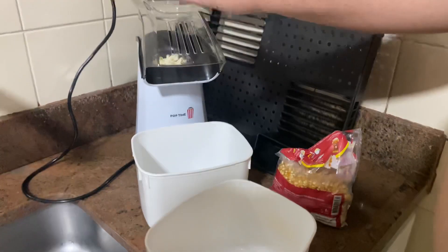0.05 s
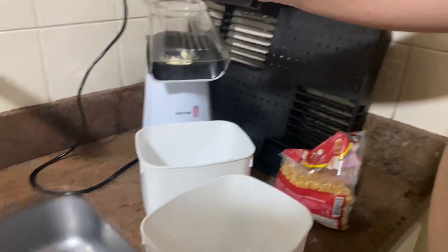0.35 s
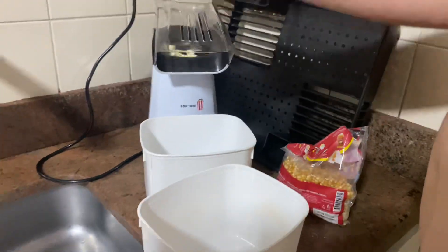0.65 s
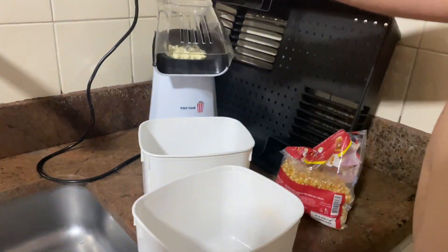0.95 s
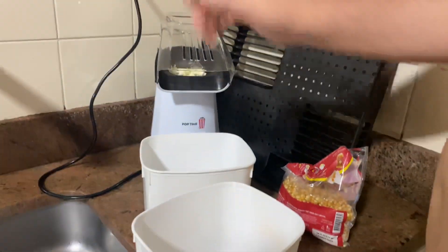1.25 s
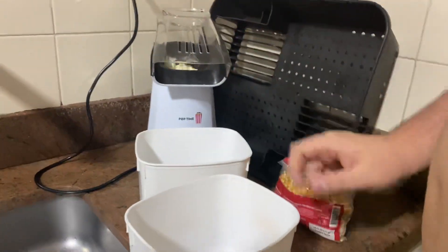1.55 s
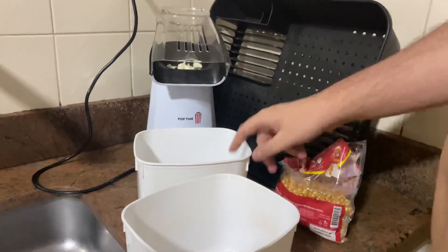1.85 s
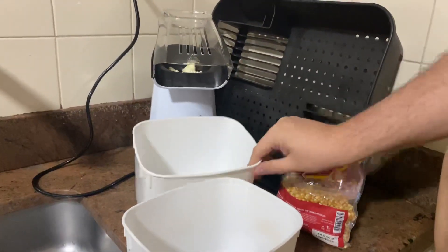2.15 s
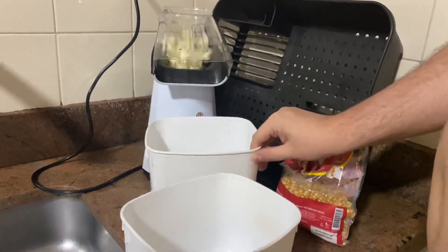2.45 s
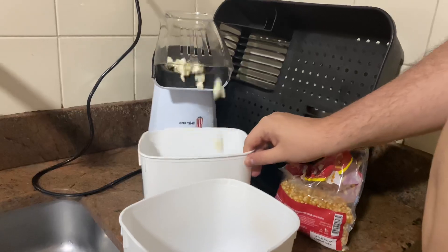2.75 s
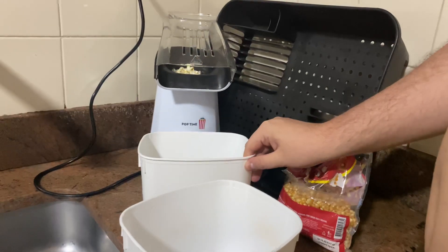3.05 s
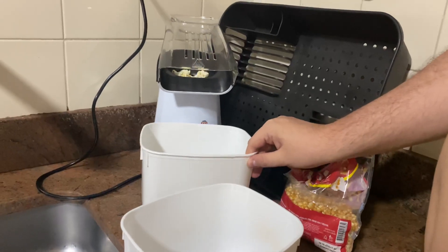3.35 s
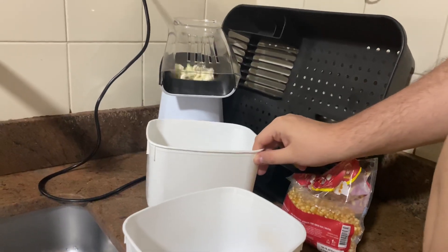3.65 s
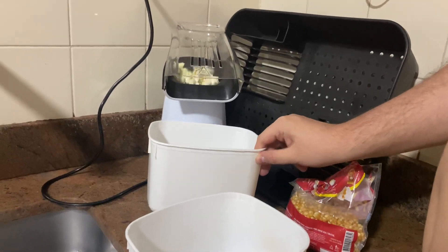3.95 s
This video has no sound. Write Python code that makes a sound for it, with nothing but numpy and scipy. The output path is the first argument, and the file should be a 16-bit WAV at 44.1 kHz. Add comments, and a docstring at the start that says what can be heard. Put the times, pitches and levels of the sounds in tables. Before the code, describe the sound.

A hot air popcorn popper whirs throughout, its fan rushing over a motor whine and buzz in a tiled kitchen. After a faint scrape, two kernels pop at about 0.7 and 0.9 seconds. A cluster of pops with a light rattle peaks near 2.4 seconds. Popped corn taps the plastic chute and tub from 2.7 to 3 seconds, and more kernels pop around 3.5 and 3.8 seconds.

```python
"""A hot-air popcorn popper runs on the counter of a tiled kitchen. Its fan drives air through the
chamber and plastic hood, over a motor whine and a mains buzz; air rings briefly under an arm held
above the hood. A hull scrapes the chamber wall. Kernels burst with a crack, a chamber ring and a low
puff of steam, scattering other kernels. Popped corn knocks down the chute into a plastic tub."""
import sys
import numpy as np
from scipy import signal
from scipy.fft import rfft, irfft, next_fast_len
from scipy.io import wavfile
from scipy.ndimage import uniform_filter1d, minimum_filter1d, map_coordinates

SR = 44100
rng = np.random.default_rng(int(sys.argv[2]) if len(sys.argv) > 2 else 0)


def persist_wave(psi):
    """Save psi, clipped to +-1, as 16-bit WAV."""
    counts = np.round(np.clip(psi, -1, 1) * 32767).astype(np.int16)
    wavfile.write(sys.argv[1], SR, np.atleast_2d(counts).T)


N = 176400  # 4 s


def amp(db):
    """dB to gain."""
    return 10 ** (np.asarray(db) / 20)


def pan(db):
    """Left and right gains for an L-R level difference."""
    return amp(np.array([[.5], [-.5]]) * db)


def along(points, hz):
    """(Hz, value) points interpolated on a log axis."""
    freqs, values = np.transpose(points)
    return np.interp(np.log(hz + 1), np.log(freqs + 1), values)


def curves(rows):
    """Per-sample curve for each column after the time."""
    times, *columns = np.transpose(rows)
    return [np.interp(np.arange(N) / SR, times, column) for column in columns]


def wobble(rate_hz):
    """Smooth random curve, rate_hz knots per second."""
    knots = rng.standard_normal(int(N * rate_hz / SR) + 4)
    return map_coordinates(knots, [np.arange(N) * rate_hz / SR])


def noise(gain, corr, lead_s=0):
    """Stereo noise, rms 1, left leading by lead_s; gain and L-R correlation are functions of Hz."""
    hz = np.fft.rfftfreq(N, 1 / SR)
    a, b = rfft(rng.standard_normal((2, N)))
    angle = np.arccos(np.clip(corr(hz), -1, 1)) / 2
    mid, side = a * np.cos(angle), b * np.sin(angle)
    delay = np.exp(-2j * np.pi * hz * lead_s)
    x = irfft(gain(hz) * np.array([mid + side, (mid - side) * delay]), N)
    return x / np.sqrt(np.mean(x ** 2) + 1e-20)


def resonance(centre_hz, width_hz, corr):
    """Turbulence ringing in one steep-sided resonance."""
    return noise(lambda hz: 1 / (1 + 2 * ((hz - centre_hz) / width_hz) ** 2), lambda hz: corr)


def bursts(spectrum, events, attack_s, corr, t60_s=.026):
    """Noise bursts (time [s], level [dB], hold [s]) of one spectrum: rise, hold, decay."""
    envelope = np.zeros(N + SR)
    for start_s, db, hold_s in events:
        t = np.arange(int((hold_s + t60_s) * SR)) / SR
        decay = amp(db - 60 * np.maximum(t - hold_s, 0) / t60_s)
        envelope[round(start_s * SR):][:len(t)] += decay * (1 - np.exp(-t / attack_s))
    return envelope[:N] * noise(lambda hz: amp(along(spectrum, hz)), lambda hz: corr, lead_s=.0001664)


def ringing(modes, hits, spread_oct=.85):
    """Modes struck by hits (time [s], level [dB], pitch [Hz]); those near the pitch ring most."""
    out, t = np.zeros((2, N + SR)), np.arange(SR // 4) / SR
    hz, mode_db, t60_s = np.transpose(modes)[:, :, None]
    for start_s, db, pitch_hz in hits:
        contact = np.exp(-(np.log2(hz / pitch_hz) / spread_oct) ** 2 / 2)
        gain = amp(mode_db + 2 * rng.standard_normal(hz.shape)) * contact
        phase = .5 * rng.standard_normal((2, len(hz), 1))
        waves = gain / np.linalg.norm(gain) * amp(-60 * t / t60_s) * np.sin(2 * np.pi * hz * t + phase)
        attack = 1 - np.exp(-2 * pitch_hz * t)
        out[:, round(start_s * SR):][:, :len(t)] += np.sqrt(2) * amp(db) * waves.sum(axis=1) * attack
    return out[:, :N]


# Blower air (frequency [Hz], relative density [dB])
RUSH_SPECTRUM = [(25, -7), (42, -35), (56, -13), (90, -10.5), (140, -5), (180, -7), (240, -3), (330, -5.5),
                 (450, -4), (600, -10.5), (690, -4.5), (790, -5.5), (960, -4.5), (1150, -13.5),
                 (1700, -9.5), (1950, -22), (3000, -26), (4900, -27.5), (5400, -30), (6900, -30),
                 (8000, -36), (9700, -35.5), (12200, -39.5), (13300, -69), (15300, -40)]
# Rush balance (frequency [Hz], L-R [dB])
RUSH_PAN = [(60, 3.5), (180, 5), (300, 0.5), (600, -2.5), (900, 5), (1600, 4.5), (2600, 12.5), (4500, -5.5),
            (5700, 0)]
# Rush stereo image (frequency [Hz], L-R correlation [-])
RUSH_CORR = [(60, 0.87), (280, 0.93), (400, 0.49), (600, 0.16), (800, -0.41), (1200, 0.39), (1500, 0.4),
             (2800, -0.45), (3700, -0.46), (4500, -0.053), (7000, 0.26), (9000, -1.03), (12000, 0.47)]
# Housing and chamber air modes (centre [Hz], width [Hz], level [dB], L-R [dB], L-R correlation [-])
DUCT_MODES = [(289, 25, -35.5, 2.5, 0.97), (414, 35, -38, -9, 0.63), (554.8, 9, -39, 5, 0.6),
              (607.4, 19, -38.5, -4, 0.49), (1470, 39, -40.5, -0.5, 0.27), (2264, 29, -51, 5, 0.84),
              (2727, 75, -51.5, 9, 0.23), (6700, 51, -61.5, 7, 0.18)]
# Vent hiss (frequency [Hz], relative density [dB])
HISS_SPECTRUM = [(1200, -8), (2100, -3), (2700, 1.5), (3500, -2), (4100, -6.5), (5000, -10.5), (5300, -40),
                 (12000, -39)]
# Airflow levels (time [s], vent hiss [dB], hood tone [dB], barrel drone [dB])
FLOW_LEVELS = [(0, -41.5, -29.5, -30), (.8, -40, -31, -32), (1.6, -42.5, -33.5, -31),
               (1.8, -51, -36.5, -29.5), (2.4, -47.5, -38, -30), (2.8, -45, -33.5, -34.5),
               (3.1, -48.5, -38, -31.5), (3.8, -49, -36.5, -25)]


def airflow():
    """Fan turbulence rushes, excites the housing, hood and barrel, and hisses at the vents."""
    hiss_db, hood_db, drone_db = curves(FLOW_LEVELS)
    rush = amp(-27) * noise(lambda hz: amp(along(RUSH_SPECTRUM, hz)) * pan(along(RUSH_PAN, hz)),
                            lambda hz: along(RUSH_CORR, hz))
    duct = sum(amp(db) * pan(lr_db) * resonance(hz, width_hz, corr)
               for hz, width_hz, db, lr_db, corr in DUCT_MODES)
    hood = amp(hood_db) * pan(db=5.5) * resonance(centre_hz=868, width_hz=62, corr=.11)
    drone = amp(drone_db) * pan(db=4.5) * resonance(centre_hz=508, width_hz=33, corr=.67)
    hiss = noise(lambda hz: amp(along(HISS_SPECTRUM, hz)), lambda hz: .4, lead_s=.00005)
    return rush + duct + hood + drone + amp(hiss_db) * pan(db=-13) * hiss


# Motor partials (shaft order [-], level [dB], L-R [dB], left phase lead [rad])
WHINE_ORDERS = [(1, -41.5, 5.5, 0.52), (5, -39.5, -4, 2.66), (8, -56, 4, 5.44), (9, -49.5, 9.5, 0.92),
                (10, -56, -6, 0.79), (11, -55, 4, 0.73)]
# Shaft speed (time [s], speed [rev/s])
SHAFT_SPEED = [(.9, 207.7), (1.4, 208.4), (2.2, 209), (2.8, 207.8)]
# Mains buzz (time [s], level [dB])
BUZZ_LEVEL = [(0, -44), (.55, -46), (.8, -36), (1.05, -42), (1.25, -35), (1.55, -33.5), (1.75, -45),
              (1.95, -31.5), (2.25, -43.5), (2.5, -41), (2.9, -44.5), (3.9, -32.5)]


def motor(buzz_hz=120):
    """Wavering shaft harmonics plus a buzz at twice the mains frequency."""
    shaft_hz, = curves(SHAFT_SPEED)
    shaft_rad = 2 * np.pi * np.cumsum(shaft_hz * (1 + .0015 * wobble(14))) / SR
    left = np.array([[1], [0]])
    whine = sum(amp(db + 1.8 * wobble(6.8)) * pan(lr_db) * np.sin(order * shaft_rad + left * lead_rad)
                for order, db, lr_db, lead_rad in WHINE_ORDERS)
    buzz_db, = curves(BUZZ_LEVEL)
    buzz_gain = amp(buzz_db + 1.5 * wobble(16)) * pan(db=3.5)
    buzz = buzz_gain * np.sin(2 * np.pi * buzz_hz * np.arange(N) / SR + .45 * wobble(14))
    return np.sqrt(2) * (whine + buzz)


# Air modes between hood and arm (centre [Hz], width [Hz], L-R [dB])
GAP_MODES = [(2790, 95, 1), (3210, 100, -3)]
# Gap ring (time [s], level [dB])
GAP_LEVEL = [(.5, -55), (1, -47), (1.62, -47), (1.76, -58)]


def arm_gap():
    """Air rings between the hood and an arm above it, fading as the arm drops."""
    gap_db, = curves(GAP_LEVEL)
    ring = sum(pan(lr_db) * resonance(hz, width_hz, corr=0) for hz, width_hz, lr_db in GAP_MODES)
    return amp(gap_db) * ring


# Bright hull noise, scraping or cracking (frequency [Hz], relative density [dB])
HULL_SPECTRUM = [(300, -13), (1500, -3), (3500, -2.5), (5500, -3), (7400, 4), (8800, -1), (10500, 3),
                 (12200, -6.5), (13400, -10), (15200, -1), (16000, 1)]
# Hull scrapes (time [s], level [dB], hold [s])
SCRAPES = [(0.342, -42, 0.034)]


def scraping():
    """A hull whirling in the hot air scrapes the chamber wall."""
    roughness = amp(3 * wobble(270))
    return roughness * bursts(HULL_SPECTRUM, SCRAPES, attack_s=.0037, corr=.33, t60_s=.16)


# Bursting kernels (time [s], crack [dB], crack hold [s], snap [dB], ring [dB], pitch [Hz], puff [dB])
KERNEL_POPS = [(0.7164, -19.5, 0.001, -14, -19.5, 1490, -36), (0.862, -23.5, 0.0016, -25, -23.5, 2780, -43),
               (2.169, -27.5, 0.0019, -28, -37, 4530, -45), (2.3921, -9, 0.0067, -19, -18.5, 1720, -29),
               (2.4138, -10.5, 0.0018, -22.5, -30, 1500, -17.5),
               (2.536, -24.5, 0.0027, -27, -36, 1500, -23.5), (3.436, -12.5, 0.0041, -37, -28.5, 3500, -26),
               (3.5, -32, .003, -34, -23, 1910, -31), (3.5173, -17.5, 0.0025, -17, -17.5, 1540, -19.5),
               (3.8087, -28.5, 0.0036, -25.5, -37, 2700, -33), (3.867, -33, 0.0034, -34, -28.5, 1480, -33)]
# Dull snap (frequency [Hz], relative density [dB])
SNAP_SPECTRUM = [(600, -26), (1500, 17.5), (3000, 22), (4800, 17.5), (8000, -66)]
# Popping chamber (frequency [Hz], relative level [dB], T60 [s])
CHAMBER_MODES = [(1458, 0, .06), (1690, -3, .035), (2705, -3, .075), (4880, -9, .05)]
# Housing and hood (frequency [Hz], relative level [dB], T60 [s])
HOUSING_MODES = [(90, 0, .17), (124, 0, .14), (255, 1, .08), (470, 6, .05)]


def pops(puff_hz=170, puff_delay_s=.005):
    """Hulls tear with a crack and a duller snap, the chamber rings, steam thumps the housing."""
    times, crack_db, hold_s, snap_db, ring_db, ring_hz, puff_db = np.transpose(KERNEL_POPS)
    crack = bursts(HULL_SPECTRUM, zip(times, crack_db, hold_s), attack_s=.0005, corr=.55)
    snap = bursts(SNAP_SPECTRUM, zip(times, snap_db, hold_s / 2), attack_s=.0003, corr=.55)
    ring = ringing(CHAMBER_MODES, zip(times, ring_db, ring_hz))
    puff = ringing(HOUSING_MODES, [(s + puff_delay_s, db, puff_hz) for s, db in zip(times, puff_db)])
    return pan(db=1) * (crack + snap + ring), pan(db=3) * puff


def scatter(hits_per_pop=24, span_s=.27):
    """Each pop flings other kernels against the chamber wall: a short, fading rattle."""
    hits = []
    for pop_s, crack_db, _, snap_db, *_ in KERNEL_POPS:
        top_db = max(crack_db, snap_db) - 20.5
        for lateness, softness in rng.random((hits_per_pop, 2)):
            hit_s = pop_s + span_s * lateness
            if hit_s < N / SR:
                hits.append((hit_s, top_db - 6 * (lateness + softness), 0))
    return bursts(SNAP_SPECTRUM, hits, attack_s=.0003, corr=.3)


# Corn hitting chute and tub (time [s], level [dB], contact pitch [Hz])
CORN_HITS = [(2.7468, -15, 1000), (2.7922, -10, 1500), (2.7956, -14, 1650), (2.8872, -18, 1700),
             (2.991, -20, 2300), (3.025, -14, 540)]
# Plastic chute and tub (frequency [Hz], relative level [dB])
PLASTIC_MODES = [(340, 0), (590, 0), (830, -2), (1190, 0), (1500, -1), (1790, -1), (2130, -6), (2600, -4)]


def knocks(detune=.05, t60_s=.024):
    """Popped corn taps the plastic, short and hollow; the modes differ from spot to spot."""
    spots = 1 + detune * rng.standard_normal((len(CORN_HITS), len(PLASTIC_MODES)))
    taps = np.zeros((2, N))
    for hit, ratios in zip(CORN_HITS, spots):
        modes = [(hz * ratio, db, t60_s) for (hz, db), ratio in zip(PLASTIC_MODES, ratios)]
        taps += ringing(modes, [hit])
    return pan(db=2) * taps


# Tiled room decay (frequency [Hz], T60 [s])
ROOM_T60 = [(100, 0.65), (400, 0.73), (2500, 0.5), (7000, 0.43), (16000, 0.11)]


def kitchen(x, corr):
    """Room tail, redrawn every half second; each frequency dies at its own rate."""
    out, block = np.zeros((2, N + 2 * SR)), SR // 2
    angle = np.arccos(corr) / 2
    for start in range(0, N, block):
        hz, t, spectra = signal.stft(rng.standard_normal((2, SR // 2)), SR, nperseg=256)
        decay = amp(-60 * t / along(ROOM_T60, hz)[:, None])
        _, (a, b) = signal.istft(spectra * decay, SR, nperseg=256)
        mid, side = a * np.cos(angle), b * np.sin(angle)
        tail = np.array([mid + side, mid - side]) / np.linalg.norm(mid + side)
        wet = signal.fftconvolve(x[:1, start:start + block], tail, axes=1)
        out[:, start:start + wet.shape[1]] += wet
    return out[:, :N]


def scene():
    """The running popper; pops, rattles and knocks excite the room."""
    cracks, puffs = pops()
    kernels = cracks + scatter()
    taps = knocks()
    room = kitchen(amp(-5.5) * kernels + amp(-7) * taps, corr=.13) + amp(-3) * kitchen(puffs, corr=1)
    air = (airflow() + arm_gap()) * amp(.5 * wobble(14))
    return air + motor() + scraping() + kernels + puffs + taps + room


def record(dry, low_cut_hz=48, ceiling=.78, limiter_s=.001, top_hz=16100):
    """Low cut, peak limiter, steep low-pass."""
    x = signal.sosfilt(signal.butter(4, low_cut_hz, 'high', fs=SR, output='sos'), dry)
    span = round(limiter_s * SR)
    needed_gain = ceiling / np.maximum(np.abs(x).max(axis=0), ceiling)
    gain = uniform_filter1d(minimum_filter1d(needed_gain, 2 * span), span)
    size = next_fast_len(N + SR // 4)
    low_pass = 1 / (1 + (np.fft.rfftfreq(size, 1 / SR) / top_hz) ** 120)
    return irfft(rfft(x * gain, size) * low_pass, size)[:, :N]


dry = scene()
out = record(dry)
persist_wave(out)
```